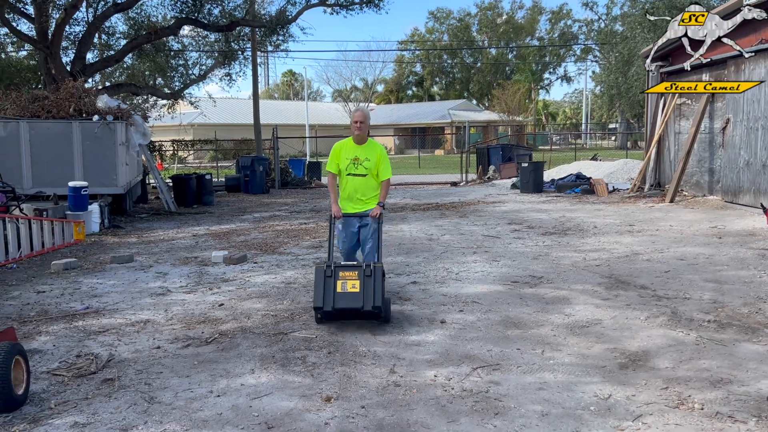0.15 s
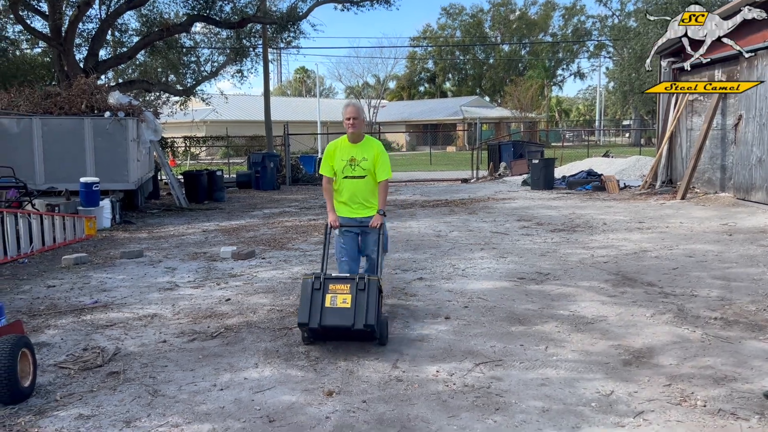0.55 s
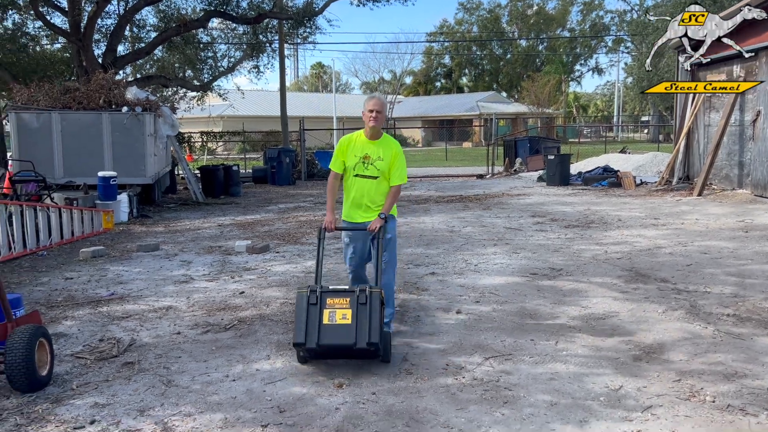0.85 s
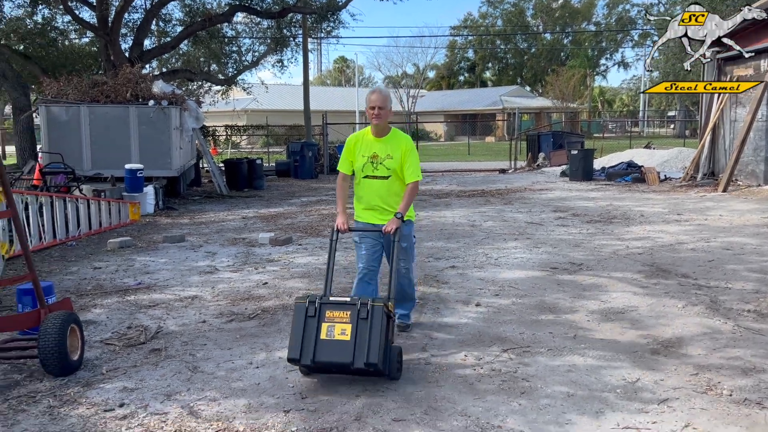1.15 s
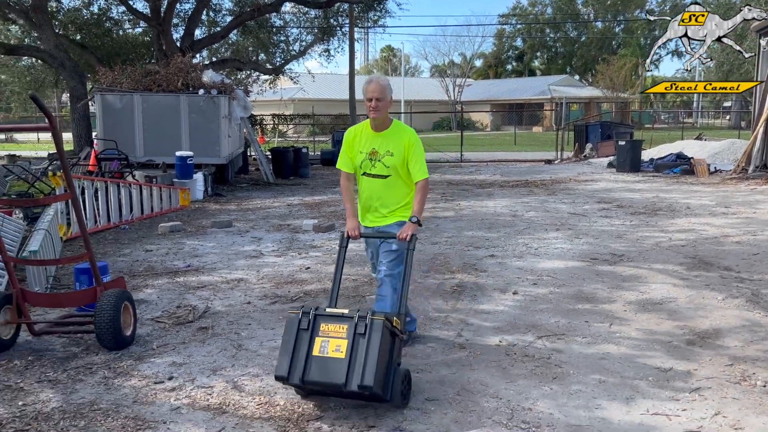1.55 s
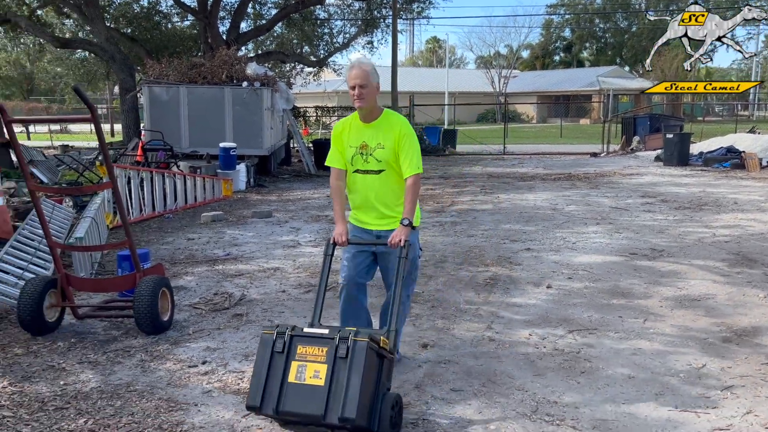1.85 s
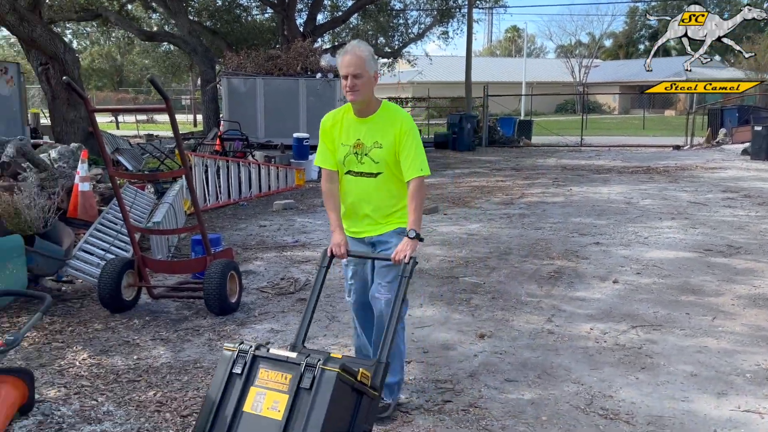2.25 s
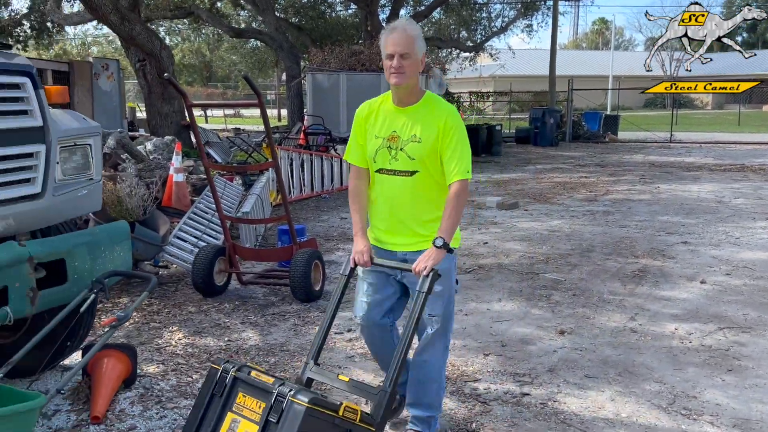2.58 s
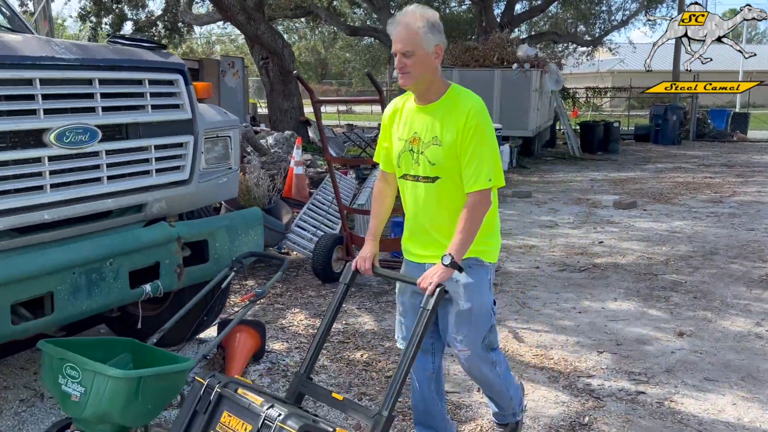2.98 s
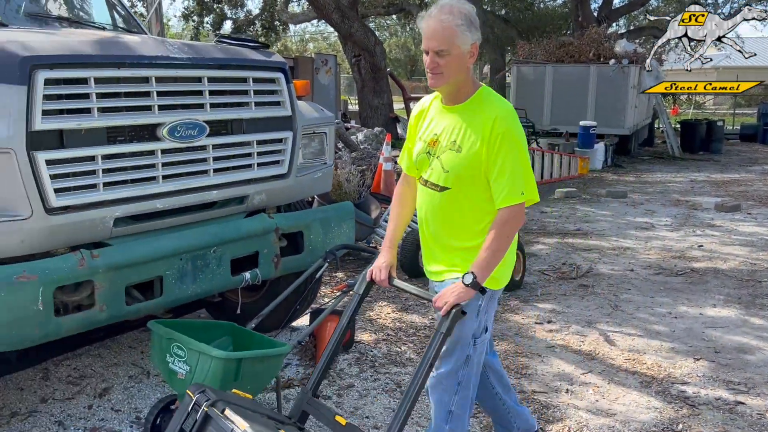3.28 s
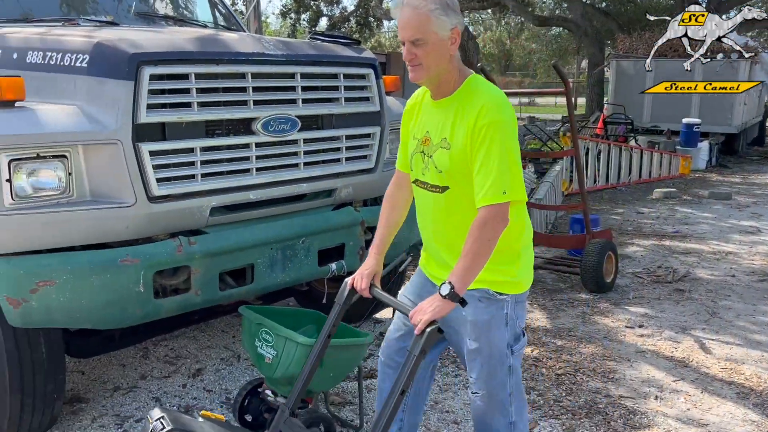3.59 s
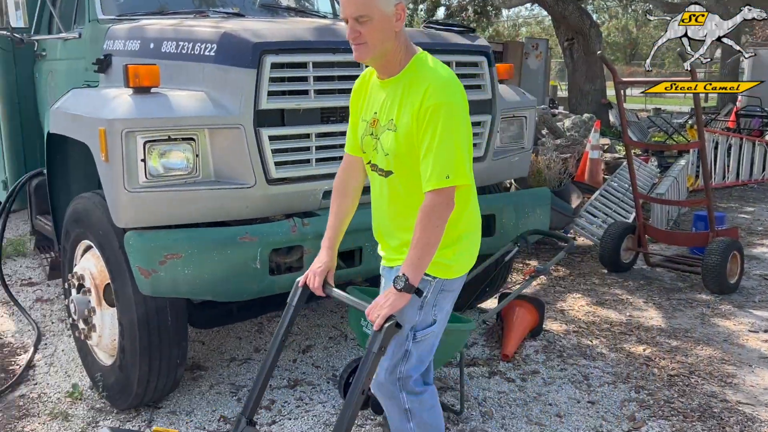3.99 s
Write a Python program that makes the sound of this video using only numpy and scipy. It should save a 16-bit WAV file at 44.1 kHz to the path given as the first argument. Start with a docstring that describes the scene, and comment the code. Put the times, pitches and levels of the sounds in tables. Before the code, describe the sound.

A hollow plastic tool chest on hard wheels rumbles and clacks across rough dirt, booming over bumps, drawing close and passing the microphone.

```python
"""In a dirt yard, a plastic tool chest on two hard wheels is rolled up to the microphone and past it.
The uneven ground shakes the hollow chest: filtered noise rumbles, decaying modes drone and boom on the bumps,
low swings thud, and short flurries of impacts through plastic resonances make the lid and handle clack.
Grit crunches under wheels and shoes as dense tiny ringing impacts; now and then a small stone snaps."""
import sys
import numpy as np
from scipy import signal
from scipy.fft import irfft
from scipy.io import wavfile
from scipy.ndimage import uniform_filter1d

SR = 44100
rng = np.random.default_rng(int(sys.argv[2]) if len(sys.argv) > 2 else 0)


def store_wav(level_fs):
    """Save 16-bit WAV to argv[1]."""
    pcm = np.round(np.clip(np.atleast_2d(level_fs), -1, 1) * 32767)
    wavfile.write(sys.argv[1], SR, pcm.T.astype(np.int16))


N = 182129
TIME = np.arange(N) / SR
TAPS = 4096  # samples in a filter or a short sound
BINS = np.fft.rfftfreq(TAPS, 1 / SR)
AGE = np.arange(TAPS) / SR

# spectrum of cracking grit: (frequency [Hz], relative level [dB])
GRIT_SPECTRUM = [(300, -7), (1200, 6), (2800, 8), (4000, 0), (5000, 2), (7000, -1), (9300, 2),
                 (11500, -6.5), (13000, -8), (15500, -16.5)]


def gain_of(db):
    """Decibels to amplitude."""
    return 10 ** (np.asarray(db) / 20)


def evened(x):
    """Scales to rms 1."""
    return x / np.sqrt(np.mean(x ** 2) + 1e-20)


def follow(rows):
    """A curve at every sample, joined by straight lines over time."""
    return np.interp(TIME, *np.transpose(rows))


def read(points):
    """A table over frequency, joined by straight lines on a log axis."""
    hz, value = np.transpose(points)
    return np.interp(np.log(BINS + 1), np.log(hz + 1), value)


def add(mix, s, sound):
    """Lays a sound into the mix at a time in seconds."""
    part = mix[max(round(s * SR), 0):][:len(sound)]
    part += sound[:len(part)]


def causal(gain):
    """The minimum-phase impulse response with this gain, its highest point scaled to 1."""
    log_gain = np.log(np.maximum(gain / gain.max(), 1e-5))
    circle = np.concatenate([log_gain, log_gain[-2:0:-1]])
    spectrum = np.exp(np.conj(signal.hilbert(circle)))
    return irfft(spectrum[:len(gain)])


def through(x, response):
    """Passes a signal through an impulse response."""
    return signal.fftconvolve(x, response)[:len(x)]


def cart(load):
    """All but the bumps and thuds of the passing cart and shoes; the brighter parts get a short yard echo."""
    bright = loose_parts(load) + gravel(load) + shoes() + stones() + crunches()
    echo = through(bright, echoes(t60=0.049, first=0.0064))
    return wheels() + drone() + bright + gain_of(-10) * echo


def nearness_db():
    """Level by distance on a straight pass at walking pace, 0 dB at the closest point."""
    speed_m_per_s, closest_m, pass_s = 1.036, 1.6, 3.09
    return -20 * np.log10(np.hypot(1, speed_m_per_s * (TIME - pass_s) / closest_m))


def shaking_db():
    """Each stony patch changes the shaking of the cart for as long as the wheels are on it."""
    # patches of stones: (start [s], length [s], extra shaking [dB])
    patches = [(0.021, 0.13, 8), (0.379, 0.13, 8), (0.614, 0.16, 12), (1.239, 0.23, 8), (1.63, 0.12, 7),
               (1.908, 0.32, 4.5), (2.267, 0.29, 7), (2.595, 0.274, 3), (3.225, 0.257, 3.5),
               (3.584, 0.25, 5), (4.022, 0.2, -1)]
    edge_s = 0.022  # the shaking builds and dies this quickly
    total_db = 0
    for s, length, db in patches:
        to_nearest_end = np.minimum(TIME - s, s + length - TIME)
        total_db = total_db + db * np.clip(to_nearest_end / edge_s, 0, 1)
    return total_db


def heave_db():
    """The rumble swells as the wheels sink into a hollow and sinks as they glide over a flat spot."""
    # hollows, and flat spots where the level is negative: (middle [s], length [s], extra rumble [dB])
    hollows = [(0.087, 0.13, 11), (0.54, 0.093, 12), (0.921, 0.041, 8), (0.992, 0.073, -23), (1.3, 0.24, 5),
               (1.48, 0.12, 11), (2.054, 0.25, 7), (2.356, 0.32, 7), (2.654, 0.04, 13.5), (3.013, 0.28, 7),
               (3.278, 0.027, 10.5), (3.377, 0.036, 7.5), (3.502, 0.099, 3.5), (4.027, 0.35, 5)]
    return sum(db * np.exp(-(2 * (TIME - s) / length) ** 2) for s, length, db in hollows)


def wheels():
    """Hard wheels follow the rough ground and heave the whole cart: noise through a low resonance."""
    # spectrum of the wheels' heave: (frequency [Hz], relative level [dB])
    rumble_spectrum = [(20, -43), (35, -47), (50, -14), (68, 0.5), (88, 1.5), (108, 0.5), (140, -5),
                       (400, -55)]
    level_db = -37.5  # on level ground at the closest point
    heave = causal(gain_of(read(rumble_spectrum)))
    ground = rng.standard_normal(N) * gain_of(level_db + nearness_db() + heave_db())
    return through(ground, heave / np.linalg.norm(heave))


def chest_ring(hardness_db, rise, push_hz=170, favour_db=3, flex=0.099):
    """The walls swing up and die away; modes near the push ring most, and a low-pitched push flattens them."""
    # modes of the hollow chest: (frequency before the flex [Hz], relative level before the push [dB], t60 [s])
    chest_modes = [(107, 1, 0.037), (147.1, 0, 0.15), (166.6, 1, 0.1), (185.5, -1.5, 0.16),
                   (240, -18.5, 0.16), (326.5, -8, .11), (413.4, -20.5, 0.18), (497, -20.5, 0.11),
                   (600, -29, 0.1), (720, -24.5, 0.056)]
    t = np.arange(SR // 4) / SR
    hz, db, t60 = np.transpose(chest_modes)[:, :, None]
    octaves = np.log2(hz / push_hz)
    db = db + hardness_db * octaves + favour_db / (1 + (octaves / .25) ** 2)
    stretch = (push_hz / chest_modes[2][0]) ** flex
    ring = (gain_of(db - 60 * t / t60) * np.sin(2 * np.pi * hz * stretch * t)).sum(0)
    ring *= 1 - np.exp(-(t / rise) ** 2)
    return ring / abs(ring).max()


def drone():
    """Small random jolts keep the chest droning in uneven lumps."""
    level_db = -36.5  # on smooth ground at the closest point
    per_shaking, per_heave = 0.54, 0.46  # dB of drone for each dB of extra shaking and of extra rumble
    kicks = [impacts(per_s=20, spread_db=1.5) for _ in range(6)]
    jolts = np.zeros(N)
    for kick, hz in zip(kicks, np.geomspace(110, 250, len(kicks))):
        jolts += through(kick, chest_ring(hardness_db=3.0, rise=0.002, push_hz=hz))
    drive_db = per_shaking * shaking_db() + per_heave * heave_db()
    return gain_of(level_db + nearness_db() + drive_db) * evened(jolts)


def bumps():
    """Ruts and stones push the chest, and its modes boom."""
    # a wheel hits a bump: (time [s], relative peak level [dB], pitch the push favours [Hz],
    # hardness as a tilt of the chest's modes [dB per octave])
    bump_rows = [(0.082, -22.5, 143, 5), (0.099, -23, 240, 5), (0.436, -26.5, 225, 8), (0.481, -24, 181, 3),
                 (0.519, -26, 115, -10), (0.655, -22, 177, 17), (0.694, -17.5, 144, -16),
                 (0.707, -18, 142, -3), (0.721, -26, 145, 2), (0.886, -25, 178, -4),
                 (1.259, -28, 131.3, -2), (1.283, -33, 200, 13), (1.335, -25.5, 149, -7),
                 (1.424, -22, 143, 6), (1.486, -20, 153, 4.5), (1.544, -16.5, 188, 3),
                 (1.583, -18.5, 126, 0), (1.657, -14.5, 170, -2), (1.951, -10.5, 192, 0),
                 (2.066, -21.5, 153, 10), (2.089, -16.5, 184, 0), (2.158, -14.5, 200, 2),
                 (2.315, -18, 181, 5.5), (2.495, -14, 185, 9.5), (2.514, -13, 163, -0.5),
                 (2.618, -19.5, 161, 7), (2.652, -23, 155, 6), (2.936, -16.5, 213, 3.5),
                 (2.984, -23, 206, 5), (3.588, -32.5, 252, 7), (4.052, -22.5, 185, -13)]
    out = np.zeros(N)
    for s, db, push_hz, hardness_db in bump_rows:
        add(out, s, gain_of(db - 0.5) * chest_ring(hardness_db, rise=0.0055, push_hz=push_hz))
    return out


def thuds():
    """A wheel drops into a rut; the whole cart sinks and rebounds in a few low swings without ringing."""
    # thuds: (middle [s], relative level [dB], pitch [Hz])
    thud_rows = [(0.914, -21.5, 140), (1.093, -23.5, 134), (2.213, -17.5, 154), (2.519, -16, 160),
                 (2.965, -18, 135), (3.04, -16.5, 127), (3.063, -25, 106), (3.12, -18, 135),
                 (3.134, -31.5, 48.3), (3.279, -27, 133), (3.298, -25, 109), (3.386, -31, 44),
                 (3.453, -24.5, 130), (3.759, -17.5, 150), (3.962, -26, 153), (4.03, -33, 68)]
    build_cycles = 0.72  # swings that a thud takes to build, and again to die
    out, t = np.zeros(N), AGE - AGE.mean()
    fade = signal.windows.tukey(TAPS, .5)
    for s, db, hz in thud_rows:
        turns = t * hz
        swing = np.exp(-(turns / build_cycles) ** 2) * np.sin(2 * np.pi * turns)
        add(out, s + t[0], gain_of(db) * swing * fade)
    return out


def loose_parts(load):
    """Lid, latches and handle rattle with the load on the wheels, and clack in short flurries of blows."""
    # the cart comes close and turns its side to the microphone: (time [s], share of side view [0-1])
    turn_rows = [(2.05, 0.4), (2.45, 0.34), (3.2, 1)]
    # lid, latches and handle clack: (time [s], relative level [dB], pitch of the struck spot [Hz],
    # decay time of the chatter [s])
    clack_rows = [(0.038, -41, 1310, 0.0036), (0.064, -40.5, 1770, 0.0091), (0.093, -41, 1510, 0.012),
                  (0.232, -37.5, 790, 0.004), (0.435, -34, 770, 0.0026), (0.454, -35.5, 1930, 0.0034),
                  (0.523, -30, 866, 0.0028), (0.6408, -28, 1830, 0.0062), (0.653, -32, 1300, 0.0089),
                  (0.6621, -21, 790, 0.004), (0.671, -36, 1780, 0.0098), (0.688, -35, 1100, 0.013),
                  (0.711, -35, 790, 0.016), (0.74, -40.5, 1880, 0.004), (0.8754, -21.5, 990, 0.0018),
                  (0.881, -33.5, 1100, 0.0052), (1.236, -37, 720, 0.0053), (1.2589, -18, 1840, 0.00049),
                  (1.281, -32.5, 820, 0.0052), (1.289, -35, 1820, 0.004), (1.307, -30.5, 1200, 0.009),
                  (1.345, -30.5, 680, 0.0032), (1.42, -33, 520, 0.0044), (1.4866, -23, 760, 0.0031),
                  (1.5235, -25.5, 810, 0.0024), (1.538, -25.5, 1070, 0.0044), (1.573, -29.5, 930, 0.0032),
                  (1.58, -27.5, 1160, 0.0025), (1.6475, -25.5, 1210, 0.0082), (1.667, -33, 1520, 0.009),
                  (1.682, -44, 1980, 0.005), (1.71, -36.5, 1210, 0.0057), (1.809, -37.5, 1960, 0.0032),
                  (1.842, -37, 835, 0.0035), (1.889, -31, 634, 0.0056), (1.9406, -23.5, 1520, 0.0079),
                  (1.958, -35.5, 1010, 0.017), (2.0, -38, 2040, 0.0052), (2.0653, -34, 1200, 0.0042),
                  (2.077, -28, 774, 0.0021), (2.12, -36, 1280, 0.015), (2.143, -28, 1240, 0.0043),
                  (2.1515, -27.5, 790, 0.013), (2.294, -35, 1320, 0.011), (2.3248, -34.5, 960, 0.0051),
                  (2.334, -32, 1030, 0.0066), (2.49, -35, 2030, 0.0085), (2.502, -28.5, 1100, 0.0068),
                  (2.518, -33, 800, 0.0055), (2.564, -31.5, 1940, 0.0024), (2.605, -32.5, 1360, 0.007),
                  (2.844, -36.5, 2130, 0.0073), (2.921, -35, 1260, 0.008), (2.938, -29.5, 990, 0.0054),
                  (2.9475, -24.5, 1110, 0.0035), (2.972, -32.5, 1810, 0.0047), (2.985, -32, 1230, 0.0058),
                  (3.095, -36, 1180, 0.0024), (3.184, -42, 1210, 0.0045), (3.226, -35, 1230, 0.003),
                  (3.255, -34.5, 1170, 0.0079), (3.2737, -30.5, 1260, 0.0028), (3.289, -33.5, 1210, 0.0023),
                  (3.359, -34, 1840, 0.0039), (3.405, -35, 1000, 0.0086), (3.4252, -16.5, 1150, 0.00075),
                  (3.482, -42, 2560, 0.0045), (3.584, -37.5, 600, 0.0058), (3.679, -31, 810, 0.0025),
                  (3.735, -41, 1500, 0.012), (4.027, -36, 1030, 0.0068), (4.039, -34, 1320, 0.0028)]
    rattle_db, rattle_share = -47, 1  # on smooth ground at the closest point; dB for each dB of extra shaking
    # higher spots are stiffer and sound brighter: tilt at the middle pitch [dB per octave],
    # and the rise of that tilt for each octave of pitch
    middle_hz, middle_tilt_db, tilt_rise_db = 1595, 0.35, 3.5
    ticks = grains(per_s=400, spread_db=3.8, t60=0.03, low_hz=420, high_hz=3250, lift_db=7, width=0.14, count=32)
    front, side = (evened(through(ticks * load, causal(shell_gain(view, bright_db=-0.3)))) for view in (0, 1))
    turn = np.clip(follow(turn_rows), 0, 1)
    level = gain_of(rattle_db + nearness_db() + rattle_share * shaking_db())
    out = level * (front + turn * (side - front))
    for s, db, hz, length in clack_rows:
        bright_db = middle_tilt_db + tilt_rise_db * np.log2(hz / middle_hz)
        shell = shell_gain(turn[int(s * SR)], bright_db, soft_hz=3520)
        colour = causal(shell * spot(hz, lift_db=7.5, width=0.13))
        flurry = chatter(length, lumpy_db=2)
        add(out, s, gain_of(db + 1.0) * struck(flurry, colour, length))
    return out


def shell_gain(turn, bright_db, soft_hz=3900):
    """Broad plastic resonances, heard from front (turn 0) to side (1); the soft contact takes off the top."""
    # resonances of the lid and handle:
    # (frequency [Hz], width [Hz], relative level from the front [dB], relative level from the side [dB])
    shell_modes = [(319.4, 52, 12, 9.5), (426, 134, -2.5, 5), (737, 380, -3, 4.5), (1138, 155, -3.5, 4),
                   (1320, 540, -63, 2.5), (1777, 48, 0, -35), (1900, 150, -0.5, -6), (2395, 200, -54, -3),
                   (2790, 260, -6.5, -13), (3330, 310, -43, -6.5)]
    power = 0
    for hz, width, front, side in shell_modes:
        detune = (BINS ** 2 - hz ** 2) / (width * (BINS + 1))
        power = power + gain_of(front + turn * (side - front)) ** 2 / (1 + detune ** 2)
    tilt = gain_of(bright_db * np.log2(np.clip(BINS, 300, 6000)))
    return np.sqrt(power / (1 + (BINS / soft_hz) ** 4)) * tilt


def spot(hz, lift_db, width):
    """Each struck spot or stone favours its own pitch; width in octaves."""
    return gain_of(lift_db / (1 + (np.log2((BINS + 1) / hz) / width) ** 2))


def chatter(length, lumpy_db):
    """A dying flurry of tiny uneven blows with a clean one near its start; long contacts are mostly flurry."""
    first_blow_s = 0.002  # a contact this short puts about half of its energy into the clean blow
    length = max(length, 1 / SR)
    lumps = evened(uniform_filter1d(rng.standard_normal(TAPS), size=30))
    age, build = AGE / length, .16  # both in decay times
    envelope = np.exp(-age) * (1 - np.exp(-age / build))
    flurry = rng.standard_normal(TAPS) * gain_of(lumpy_db * lumps) * envelope
    blow = np.arange(TAPS) == np.argmax(age >= build)
    return flurry / np.linalg.norm(flurry) + blow * np.sqrt(first_blow_s / length)


def struck(flurry, colour, length):
    """A flurry rings a body; about rms 1 at its start."""
    sound = through(flurry, colour)
    return sound / np.linalg.norm(sound) * np.sqrt(max(length, 1 / SR) * SR / 2)


def impacts(per_s, spread_db):
    """Random clicks of either sign: many small, a few large."""
    size = gain_of(spread_db * np.minimum(rng.exponential(1, N), 3))
    return size * rng.choice([-1, 1], N) * (rng.random(N) < per_s / SR)


def grains(per_s, spread_db, t60, low_hz, high_hz, lift_db, width, count):
    """Impacts on several spots, each with its own brief noisy ring and pitch."""
    out = np.zeros(N)
    for hz in np.geomspace(low_hz, high_hz, count):
        decay = rng.standard_normal(TAPS) * gain_of(-60 * AGE / t60)
        ring = through(decay, causal(spot(hz, lift_db, width)))
        out += through(impacts(per_s / count, spread_db), ring / np.linalg.norm(ring))
    return out


def clumps(depth_db, size):
    """Gravel gives way in uneven clumps: smoothed noise as a level, each clump about size samples long."""
    smooth = signal.oaconvolve(rng.standard_normal(N), signal.windows.hann(size), "same")
    return gain_of(depth_db * evened(smooth))


def gravel(load):
    """Sand grains crack under the load on the wheels in short, separate ticks."""
    # grit under the wheels, before distance and shaking: (time [s], level [dB])
    grit_level = [(0, -56.5), (2.6, -57.5), (3.05, -62.5), (4.1, -59.5)]
    per_shaking = 0.47  # dB of grit for each dB of extra shaking
    cracks = grains(per_s=1200, spread_db=5.3, t60=.009, low_hz=1800, high_hz=14000, lift_db=11, width=.15, count=20)
    crunch = evened(through(cracks * load, causal(gain_of(read(GRIT_SPECTRUM)))))
    level = gain_of(follow(grit_level) + nearness_db() + per_shaking * shaking_db())
    return fizz(level * crunch, close_db=19.5)


def fizz(crunch, close_db):
    """The finest fizz of cracking grit is a treble lift, heard only from close by."""
    # how much of the fizz is heard: (time [s], share [0-1])
    fizz_rows = [(2.15, 0.02), (2.42, 1), (2.65, 0.4), (3.2, 1), (4.1, 1)]
    close = through(crunch, causal(spot(14700, lift_db=close_db, width=0.13))) * gain_of(close_db)
    return crunch + np.clip(follow(fizz_rows), 0, 1) * (close - crunch)


def shoes():
    """Under a sole crowded grit grinds and coarse pebbles knock together."""
    # a shoe scuffs the gravel: (time [s], level of fine grit before fizz [dB], level of pebbles [dB], length [s])
    scuff_rows = [(0.072, -51, -58, 0.062), (0.642, -50, -58, 0.029), (1.147, -53, -61, 0.069),
                  (1.631, -51, -49, 0.092), (2.05, -53, -42, 0.043), (2.412, -47.5, -44, 0.13),
                  (3.222, -52.5, -43.5, 0.075), (3.615, -45, -44.5, 0.075), (3.68, -55, -47, 0.094),
                  (4.081, -47, -39.5, 0.074)]
    # spectrum of pebbles knocking together: (frequency [Hz], relative level [dB])
    pebble_spectrum = [(300, -6), (800, 2), (1350, -1), (1900, -8.5), (2600, -4.5), (3500, -12.5),
                       (5000, -14.5), (12000, -26.5)]
    grind = grains(per_s=2200, spread_db=4.5, t60=.007, low_hz=1300, high_hz=3800, lift_db=8, width=.3, count=16)
    knocks = grains(per_s=700, spread_db=4.2, t60=.011, low_hz=800, high_hz=3400, lift_db=9, width=.2, count=18)
    fine, coarse = np.zeros((2, N))
    for s, fine_db, coarse_db, length in scuff_rows:
        press = signal.windows.tukey(int(length * SR), .5)
        add(fine, s, gain_of(fine_db) * press)
        add(coarse, s, gain_of(coarse_db) * press)
    give = clumps(depth_db=3, size=500)
    pebbles = coarse * evened(give * through(knocks, causal(gain_of(read(pebble_spectrum)))))
    grit = fine * evened(np.sqrt(give) * through(grind, causal(gain_of(read(GRIT_SPECTRUM)))))
    return pebbles + fizz(grit, close_db=20.5)


def stones():
    """Larger stones snap one by one under a wheel or a shoe, as brief bright flurries."""
    # snaps: (time [s], relative level [dB], decay time [s])
    stone_rows = [(0.065, -38, 0.0049), (0.094, -29, 0.0045), (0.642, -29, 0.0027), (0.878, -25, 0.0031),
                  (1.267, -35, 0.0018), (1.375, -29, 0.0019), (1.53, -37.5, 0.0045), (1.569, -34.5, 0.004),
                  (1.597, -30, 0.0018), (1.864, -35, 0.0015), (2.01, -39, 0.0045), (2.061, -33.5, 0.0048),
                  (2.282, -33, 0.008), (2.96, -40, 0.004), (3.425, -29.5, 0.0019), (3.741, -25, 0.0044),
                  (3.744, -28.5, 0.0032)]
    # spectrum of a snapping stone: (frequency [Hz], relative level [dB])
    snap_spectrum = [(500, 20.5), (2500, 9.5), (6000, 4.5), (9500, 14), (15000, 2)]
    out, snap = np.zeros(N), causal(gain_of(read(snap_spectrum)))
    for s, db, length in stone_rows:
        add(out, s, gain_of(db - 7) * struck(chatter(length, lumpy_db=4), snap, length))
    return out


def crunches():
    """A wheel crushes a crumb of hard dirt in a ragged little burst."""
    # crushed crumbs: (time [s], level [dB], pitch [Hz], decay time [s])
    crunch_rows = [(0.091, -34, 2720, 0.011), (0.419, -45, 3000, 0.0088), (0.772, -45, 3000, 0.0078),
                   (0.845, -37.5, 2620, 0.018), (0.869, -42, 4300, 0.017), (0.981, -45.5, 3700, 0.015),
                   (1.309, -43, 2700, 0.0068), (1.428, -43, 2700, 0.0033), (1.929, -50, 2900, 0.003),
                   (2.091, -32.5, 2900, 0.0028), (2.153, -40, 2600, 0.004), (2.371, -45, 2390, 0.029),
                   (2.705, -41.5, 3230, 0.004), (2.97, -32.5, 5070, 0.0071), (3.6, -43, 2850, 0.005)]
    # spectrum of a crumb breaking: (frequency [Hz], relative level [dB])
    crumb_spectrum = [(400, 7), (2000, 3.5), (5000, -7.5), (12000, -27)]
    out = np.zeros(N)
    for s, db, hz, length in crunch_rows:
        colour = causal(gain_of(read(crumb_spectrum)) * spot(hz, lift_db=8.5, width=0.12))
        flurry = chatter(length, lumpy_db=4)
        add(out, s, gain_of(db) * struck(flurry, colour, length))
    return out


def echoes(t60, first):
    """Dense reflections of energy 1 that die away; the first arrives after a few milliseconds; times in seconds."""
    t = np.arange(SR // 2) / SR
    tail = rng.standard_normal(len(t)) * gain_of(-60 * t / t60) * (t >= first)
    return tail / np.linalg.norm(tail)


def air():
    """The faint steady wash of the open yard, as filtered noise."""
    # spectrum of the open air: (frequency [Hz], relative level [dB])
    air_spectrum = [(25, -11), (80, 4.5), (300, -6), (1000, -18.5), (2500, -25.5), (5000, -36),
                    (16000, -42.5)]
    return gain_of(-44.5) * evened(through(rng.standard_normal(N), causal(gain_of(read(air_spectrum)))))


def ports(x):
    """The two microphone ports hear the treble out of step."""
    # the two ports: (frequency [Hz], phase lead of the left over the right [rad])
    port_phase = [(0, 0), (2300, 0), (3800, .4), (5800, .1), (7100, -.5), (9600, -.2), (11200, -2),
                  (12300, -3.1), (13400, -3.9), (14800, -5.4)]
    turn = np.exp(1j * read(port_phase) / 2)
    pair = np.roll(irfft(np.array([turn, turn.conj()])), TAPS // 2, axis=1)
    return signal.fftconvolve(x[None], pair, axes=1)[:, TAPS // 2:][:, :N]


def scene():
    """The cart is straight ahead; an independent draw of it and the air, in opposite signs, is the scatter."""
    # sound scattered in from the sides by ground and clutter: (frequency [Hz], level [dB])
    scatter_spectrum = [(40, -35), (90, -14.5), (180, -18.5), (300, -16), (600, -9.5), (1200, -5.5),
                        (2400, -8.5), (5000, -4.5), (9000, -6.5), (12500, -5), (16000, -10)]
    load = clumps(depth_db=1.4, size=1500)
    scatter = gain_of(read(scatter_spectrum))
    side = scatter.max() * through(cart(load) + air(), causal(scatter))
    ahead = cart(load) + bumps() + thuds() + air()
    return ports(ahead) + np.array([side, -side])


def record(dry):
    """The recorder's low cut and band limit."""
    edge_hz = 15950
    dry = signal.sosfilt(signal.butter(3, 33, "highpass", fs=SR, output="sos"), dry)
    band_limit = signal.firwin(511, edge_hz, window=("kaiser", 9), fs=SR)
    return signal.oaconvolve(dry, band_limit[None], "same")


dry = scene()
out = record(dry)
store_wav(out)
```